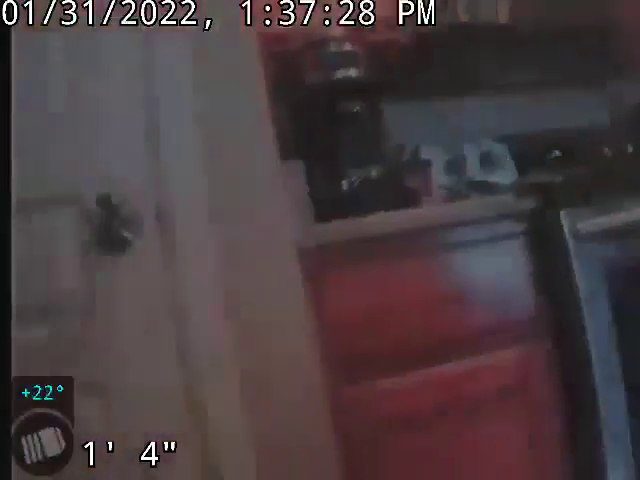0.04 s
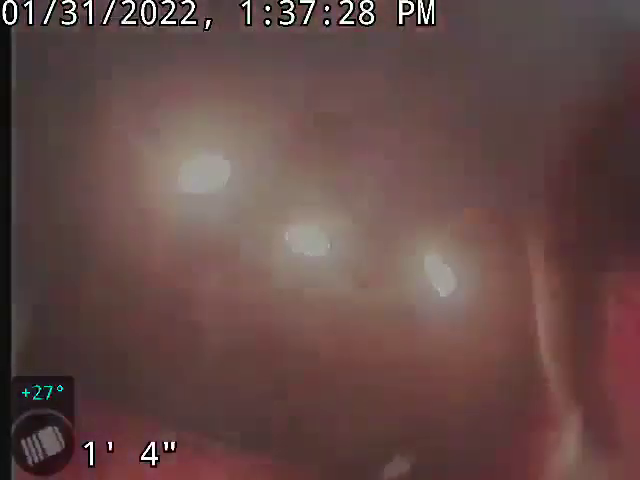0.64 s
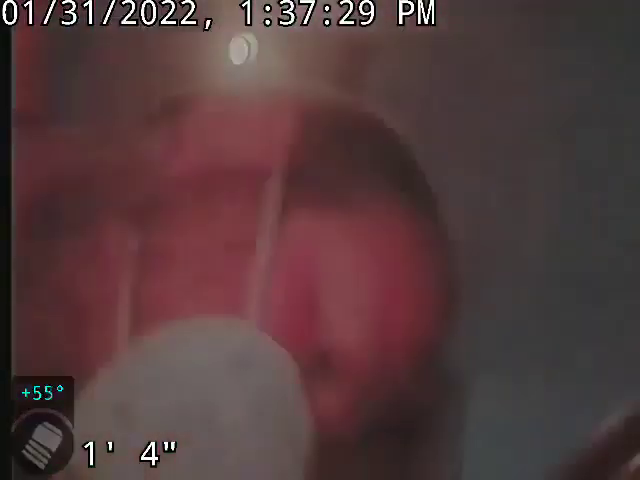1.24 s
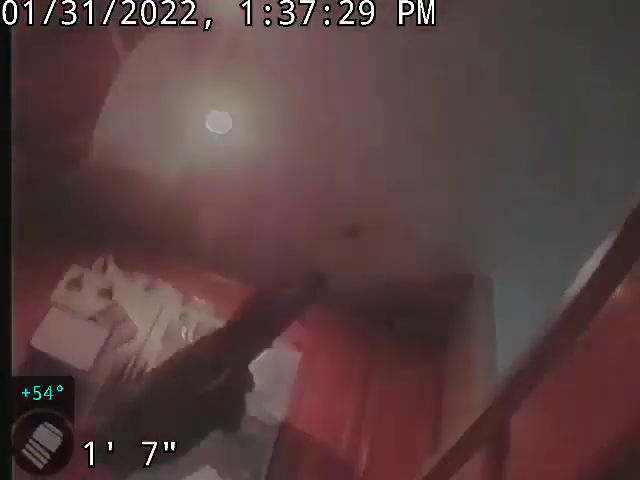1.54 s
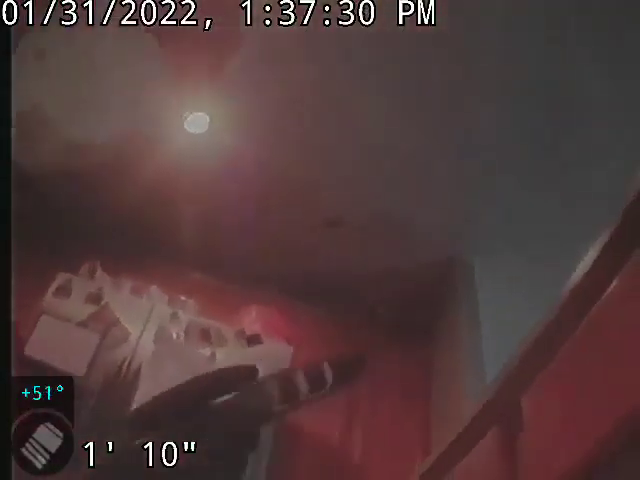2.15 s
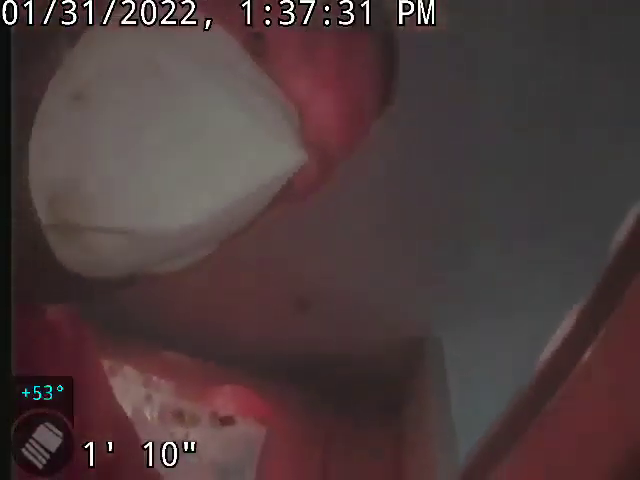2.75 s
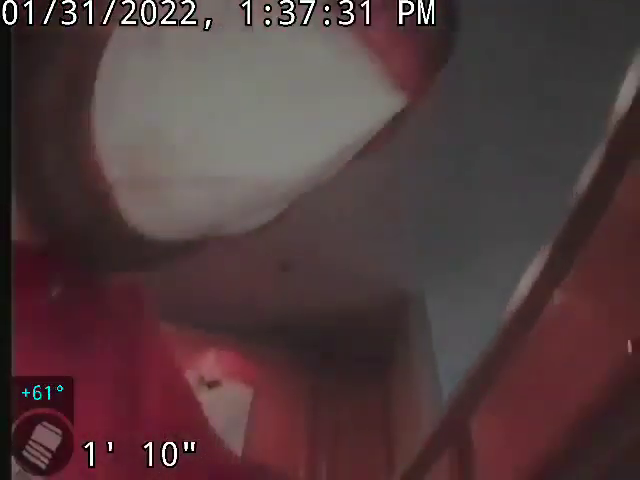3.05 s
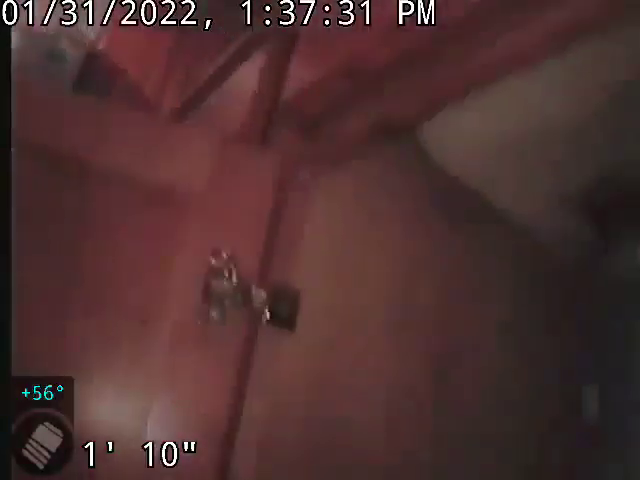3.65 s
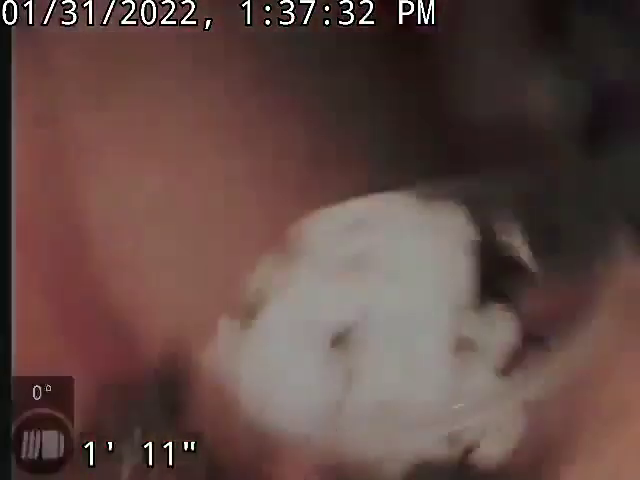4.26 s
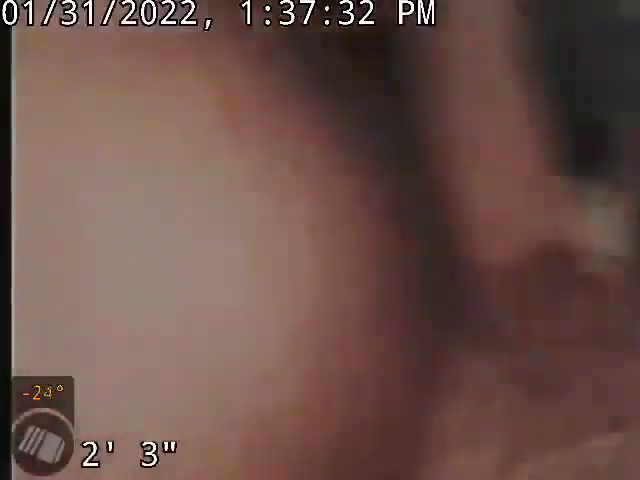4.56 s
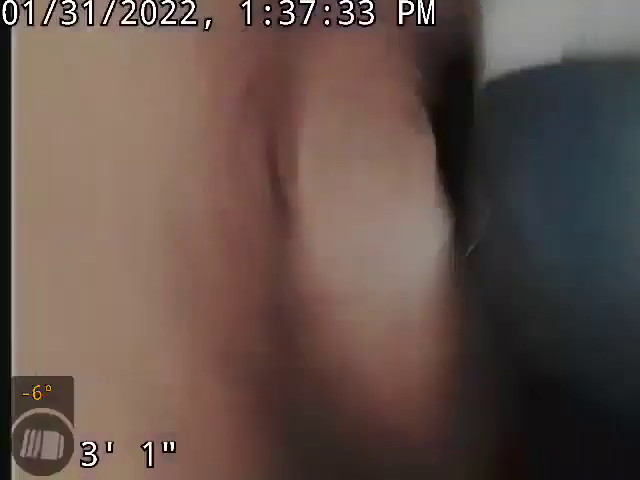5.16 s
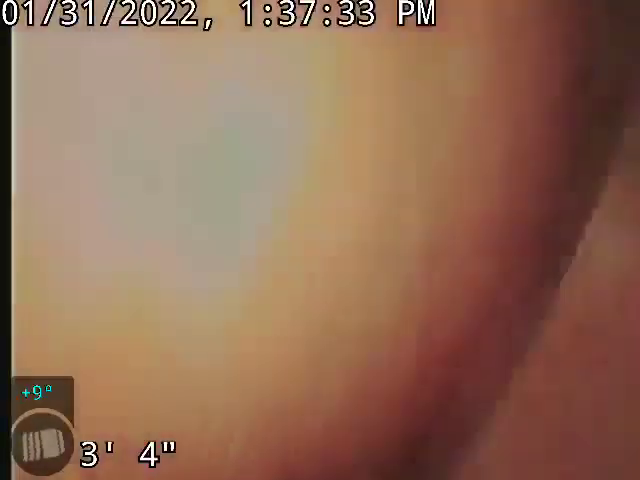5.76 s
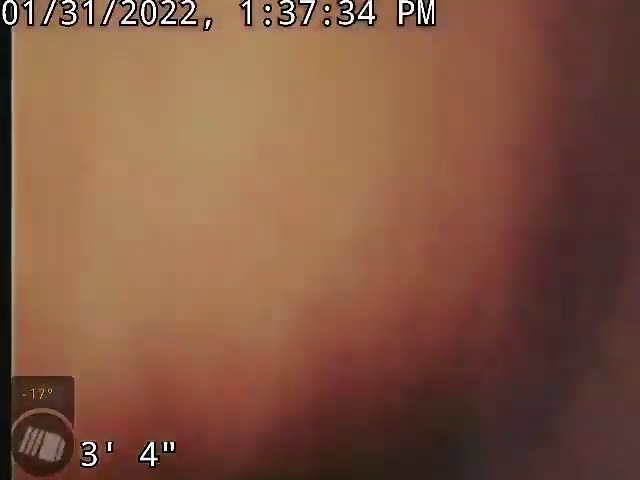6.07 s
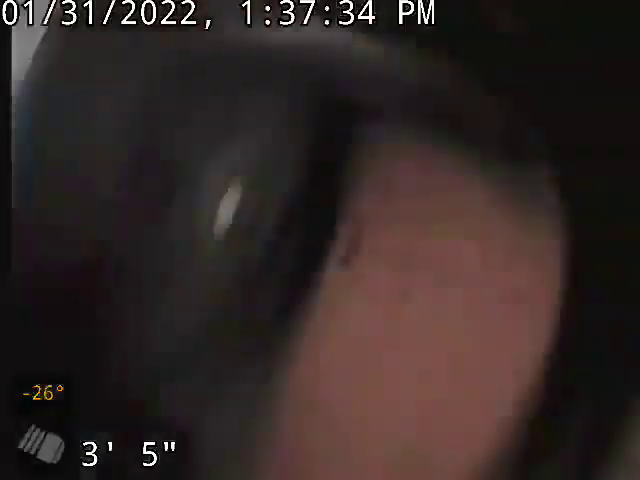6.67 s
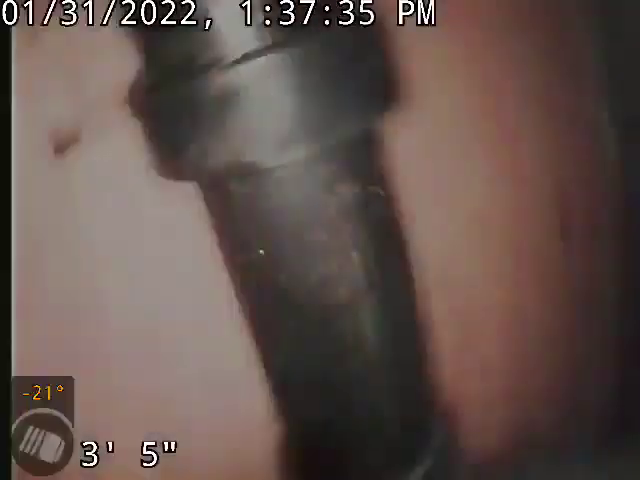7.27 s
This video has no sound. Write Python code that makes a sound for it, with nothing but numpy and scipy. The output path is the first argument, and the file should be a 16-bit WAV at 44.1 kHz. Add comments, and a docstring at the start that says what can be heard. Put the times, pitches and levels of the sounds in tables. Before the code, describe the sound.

In a small kitchen, a low hum and rumble lie under the soft scrape and squeak of a push cable and a few ticks and knocks. Hard, booming bumps hit the housing right at the microphone, and the reel's frame thuds on the floor. Then quieter handling continues: coils tap the reel, the cable ticks in its guide, and uneven knocks sound as the scraping grows a little.

```python
"""First comes a low room rumble and hum, with the faint scrape and squeak of a cable. It is an inspection
camera's push cable, pulled off its reel and fed towards a drain under a kitchen sink. It rubs and ticks
through its guide, its coils tap the reel, and the camera head and reel knock in the small room.
From about two seconds in, the unit that holds the microphone takes a few hard bumps that make its hollow
housing boom, and the frame rocks on the floor. Then the scraping and knocking go on."""
import sys
import numpy as np
from scipy import signal
from scipy.fft import rfft, irfft
from scipy.io import wavfile

SR = 44100
rng = np.random.default_rng(int(sys.argv[2]) if len(sys.argv) > 2 else 0)


def inscribe(sig):
    """Save sig as 16-bit PCM at rate SR to the path in sys.argv[1].

    A 1-D sig is mono; a 2-D sig holds one channel per row.
    Samples are clipped to [-1, 1] before scaling.
    """
    pcm = np.round(np.clip(np.atleast_2d(sig).T, -1, 1) * 32767)
    wavfile.write(sys.argv[1], SR, pcm.astype(np.int16))


N = 327222
TIME = np.arange(N) / SR   # seconds since the scene began
AGE = np.arange(int(.5 * SR)) / SR   # seconds since a hit

# Rumble of the room and of handling. Each row: time in seconds, level in dB.
RUMBLE_LEVELS = [(0, -60.5), (.9, -51.5), (1.6, -47), (1.8, -54), (2.4, -55.5), (3.3, -47), (3.55, -69),
                 (4.4, -66), (4.85, -59), (5.5, -65.5), (6.1, -53), (7.1, -55), (7.42, -50)]
# Tones of the hum. Each row: pitch in Hz, level in dB.
HUM_TONES = [(59.2, -56), (101, -56.5), (181, -61.5)]
# The hum fades as the unit is moved. Each row: time in seconds, gain in dB.
HUM_FADE = [(3.1, -2), (3.5, -18)]
# Quiet scraping between pushes. Each row: time in seconds, level in dB.
CREEP_LEVELS = [(0, -64.5), (2.2, -61), (3.5, -63), (4.2, -62.5), (5.55, -65), (6.3, -60.5), (7.42, -45.5)]
# Pushes that turn the reel. Each row: start and length in seconds, scrape level in dB, groan pitch in Hz.
CABLE_PUSHES = [(0.78, 0.13, -45, 239.4), (0.964, 0.21, -59, 240.3), (1.162, 0.09, -52, 237.2),
                (1.518, 0.17, -56, 251.3), (2.189, 0.043, -42.5, 218), (4.318, 0.3, -57.5, 223),
                (4.592, 0.3, -50, 235), (4.919, .22, -51.5, 437), (6.749, 0.16, -48, 216),
                (6.98, 0.22, -44.5, 206.4), (7.155, 0.37, -46.5, 440.6)]
# The cable slips through the hand. Each row: start and length in seconds, hiss and rasp levels in dB.
HAND_SLIPS = [(0.735, 0.18, -68, -63.5), (1.178, 0.52, -70, -66), (1.686, 0.064, -60, -71),
              (3.627, 0.098, -89.5, -73), (3.943, 0.05, -73, -69.5), (4.395, 0.22, -71, -69.5),
              (4.594, 0.29, -78, -67), (5.099, 0.31, -80.5, -73.5), (6.365, 0.19, -70, -64),
              (6.654, 0.22, -60, -66)]
# The cable's jacket sings. Each row: start and length in seconds, level in dB, first and last pitch in Hz.
JACKET_SQUEAKS = [(0, 0.98, -71, 807, 1180), (1.92, 0.25, -77, 1393, 1740), (6.07, 0.011, -56, 4100, 3980),
                  (6.308, 0.19, -73.5, 2134, 2310), (6.43, .035, -67, 4550, 4660)]
# Coils tap the reel. Each row: start in seconds, level in dB.
COIL_TAPS = [(0.503, -58), (0.607, -58), (1.081, -52), (1.675, -51), (3.208, -43), (3.613, -49),
             (3.836, -54), (3.953, -53.5), (4.214, -51), (4.333, -47), (4.624, -42), (4.673, -44.5),
             (5.317, -51), (6.469, -37.5), (6.784, -42), (6.986, -42), (7.32, -42)]
# The cable ticks in its guide. Each row: start in seconds, level in dB.
GUIDE_TICKS = [(1.295, -33.5), (1.589, -34), (1.723, -39), (3.8668, -50), (4.9228, -34.5), (4.966, -37.5),
               (5.0752, -38.5), (5.163, -41.5), (5.729, -56)]
# Head and reel knock. Each row: start in seconds, level in dB, extra lows in dB, extra clack in dB,
# treble limit in Hz, chatter fade in seconds, main and second ring in Hz, clang in dB, room echo in dB.
REEL_KNOCKS = [(1.422, -29, 6, -4, 4150, 0.0055, 239.5, 560, -28, -11),
               (2.938, -40.5, -5.5, -3.5, 5120, 0.011, 216, 860, -9, -13.5),
               (4.579, -39, 3, 2.5, 8600, 0.0044, 200, 480, 6, -15),
               (4.785, -43, 9, 9.5, 11100, 0.0043, 453, 623, 1, -15.5),
               (4.846, -44, 5, 8, 7000, 0.0084, 766, 625, 9, -9),
               (4.985, -45, 9.5, 6.5, 9340, 0.0027, 454, 502, 10.5, -12),
               (5.974, -36.5, 8.5, -4.5, 3310, 0.0099, 445, 532, 2.5, -13.5),
               (6.022, -28, 10, 7, 2620, 0.015, 418, 684, -1.5, -15.5),
               (6.479, -28, 6.5, -0.5, 11400, 0.009, 457, 237, 2, -12.5),
               (7.135, -34, 8, 7, 9300, 0.0075, 439, 640, 4.5, -11.5)]
# Hard plastic clicks right at the microphone. Each row: start in seconds, level in dB.
PLASTIC_CLICKS = [(1.672, -49), (1.697, -41), (2.2158, -34), (2.242, -29), (2.2517, -28.5), (3.1238, -27),
                  (3.142, -33), (3.286, -32)]
# Bumps on the housing. Each row: start in seconds, level in dB, extra boom in dB,
# brightness in dB per octave, ring pitch in Hz.
HOUSING_BUMPS = [(2.2319, -30, 7, 3, 202), (2.2461, -25, -13, 0, 200), (3.114, -4.5, 2.5, 0, 287),
                 (3.1301, -19.5, 5.5, -1.2, 151), (3.316, -17.5, -4, -3.5, 189.6), (3.3353, -5, 0, 1, 386),
                 (3.3655, -20.5, 4, 3, 640), (3.3704, -8.5, -2, 0, 190), (3.403, -22.5, 6.5, 1.16, 180)]
# The frame rocks on the floor. Each row: start in seconds, level in dB, pitch in Hz, fade in seconds.
FRAME_THUDS = [(2.2421, -24, 42.5, 0.055), (3.122, -11, 76, 0.017), (3.139, -15, 46, 0.025),
               (3.27, -20.5, 79, 0.033), (3.344, -11.5, 110, 0.0099), (3.386, -19.5, 59.7, 0.022),
               (6.026, -21.5, 89.9, 0.036), (7.223, -25, 49.5, 0.059)]
# The housing is dragged. Each row: time in seconds, level in dB.
DRAG_LEVELS = [(3.17, -86.5), (3.21, -46), (3.29, -36), (3.37, -40.5), (3.41, -53), (3.44, -93.5)]
# Notes at which the reel and the hollow housing ring. Each row: pitch in Hz, width in Hz, gain in dB.
REEL_MODES = [(183, 57, 17), (454.2, 4.8, 16.5), (525, 160, 11), (750, 140, 10.5), (1254, 340, 1.5),
              (3250, 69, -11.5)]
HOUSING_MODES = [(51.7, 54, 3), (171, 65, 18.5), (311, 100, 0), (640, 690, 10.5), (970, 110, -3.5)]
# Five bands of a hit: boom, body, clack, snap, fizz. Each row: low edge in Hz, high edge in Hz.
BANDS = [(30, 160), (160, 700), (700, 2500), (2500, 7000), (10500, 14500)]
# A plain knock and a plain bump. Each holds one level in dB for each of the five bands.
KNOCK_BAND_DB = [-7.5, 0, 0.5, -4, -11]
BUMP_BAND_DB = [1.5, 2, -12, -24.5, -29.5]
# The tone colour of each noise, from low to high. Each row: frequency in Hz, gain in dB.
RUMBLE_SPECTRUM = [(20, -14.5), (40, 1), (60, 6.5), (105, -0.5), (140, -8.5), (230, -7.5), (340, -16),
                   (550, -32.5), (1000, -62.5)]
SCRAPE_SPECTRUM = [(100, -27.5), (160, -13), (230, -3), (350, -9.5), (950, -17.5), (1300, -20), (2000, -32),
                   (4000, -43)]
RASP_SPECTRUM = [(600, -18.5), (1700, -5.5), (3000, 2.5), (5000, -1.5), (7500, -6.5), (10000, -27)]
HISS_SPECTRUM = [(6000, -28), (9000, -9), (12500, 0), (15000, -8)]
DRAG_SPECTRUM = [(40, -8), (100, 12.5), (300, -6), (700, -9.5), (2000, -21), (6000, -32.5), (14000, -33)]

ROOM_DECAY_S = 0.045
PUSH_ATTACK_S, PUSH_RELEASE_S = 0.021, 0.055


def from_db(db):
    """Turn decibels into a number to multiply by."""
    return 10 ** (np.asarray(db) / 20)


def unit_power(x):
    """Scale a sound so that its average power is 1."""
    return x / np.sqrt(np.mean(x ** 2) + 1e-20)


def level_curve(rows):
    """Join (seconds, dB) points into a gain for every sample."""
    times, db = np.transpose(rows)
    return from_db(np.interp(TIME, times, db))


def add(out, start, sound):
    """Mix a sound in at a start time in seconds."""
    i = max(0, round(start * SR))
    out[i:i + len(sound)] += sound[:N - i]


def filtered(x, hz, kind, order=2):
    """Keep the lows, the highs or one band of a sound."""
    sections = signal.butter(order, np.clip(hz, 10, .45 * SR), kind, fs=SR, output="sos")
    return signal.sosfilt(sections, x + 1e-18)


def coloured(x, spectrum):
    """Give a steady sound a tone colour, at power 1."""
    hz, db = np.transpose(spectrum)
    bins = np.maximum(np.fft.rfftfreq(N, 1 / SR), 1)
    gain = from_db(np.interp(np.log(bins), np.log(hz), db))
    return unit_power(irfft(rfft(x) * gain, N))


def drift(rate):
    """Wander to a new random value `rate` times a second."""
    points = rng.standard_normal(2000)
    return unit_power(np.interp(TIME * rate, np.arange(len(points)), points))


def resonance(x, hz, width):
    """Let a sound ring at one pitch; a narrower width rings longer."""
    r = np.exp(-np.pi * width / SR)
    feedback = [1, -2 * r * np.cos(2 * np.pi * hz / SR), r * r]
    return signal.lfilter(np.array([1, 0, -1]) * (1 - r * r) / 2, feedback, x + 1e-18)


def ringing(x, modes, spread_db, gain_db=0):
    """An object rings at several notes, each with a strength that varies by chance."""
    return sum(resonance(x, hz, width) * from_db(db + gain_db + rng.normal(0, spread_db))
               for hz, width, db in modes)


def reel(x, ring_db):
    """A force passes straight through and also rings the reel."""
    return x + ringing(x, REEL_MODES, spread_db=0.68, gain_db=ring_db)


def friction(grain_db, surge_db, surge_rate):
    """Rubbing is many tiny slips of uneven size, coming in surges."""
    size = np.repeat(rng.standard_normal(N // 32 + 1), 32)[:N]
    return rng.standard_normal(N) * from_db(grain_db * size + surge_db * drift(surge_rate))


def reflections(x, shift_s=0.47, count=3):
    """Echoes from the cabinet and floor colour the sound, taking turns as the cable moves."""
    out, age = x.copy(), AGE[AGE < .07]
    for k in range(count):
        response = rng.standard_normal(len(age)) * np.exp(-age / .012)
        echo = signal.oaconvolve(x, response / np.linalg.norm(response))[:N]
        away = np.abs((TIME / shift_s - k) % count - count / 2)
        out += .5 * np.sqrt(np.maximum(1 - away, 0)) * echo
    return out


def stroke(length, attack, release):
    """A movement gathers speed, holds and dies away."""
    t = TIME[:int((length + 8 * release) * SR)]
    rise = np.sin(np.pi / 2 * np.minimum(t / attack, 1)) ** 2
    return rise * np.exp(-np.maximum(t - length, 0) / release)


def strokes(rows):
    """One gain curve for many movements; where they overlap, their powers add."""
    power = np.zeros(N)
    for start, length, db, attack, release in rows:
        add(power, start, (from_db(db) * stroke(length, attack, release)) ** 2)
    return np.sqrt(power)


def rough_tone(pitch, width_hz):
    """An unsteady note kept going by rubbing, at power 1."""
    cosine, sine = filtered(rng.standard_normal((2, len(pitch))), width_hz, "low")
    phase = 2 * np.pi * np.cumsum(pitch) / SR
    return unit_power(cosine * np.cos(phase) + sine * np.sin(phase))


def note(hz, db, decay_s):
    """One struck note dying away."""
    return from_db(db) * np.sin(2 * np.pi * hz * AGE) * np.exp(-AGE / decay_s)


def strike(decay_s, rings, room_db):
    """A short chatter shakes the reel, the struck spot rings, and the room answers, duller and longer."""
    contact, echo = rng.standard_normal((2, len(AGE)))
    contact = contact * np.exp(-AGE / max(decay_s, .001))
    echo = filtered(echo, 2700, "low", order=1) * np.exp(-AGE / ROOM_DECAY_S)
    room = from_db(room_db) * reel(echo, ring_db=1.5)
    return filtered(reel(contact, ring_db=-1.0) + rings + room, 420, "low", order=1)


def balanced(x, band_db, window_s):
    """Set how strong a hit's first moments are in each of the five bands."""
    early = np.clip((window_s - AGE) * SR, 0, 1)
    parts = [filtered(x, band, "band", order=2 if band[1] < 1000 else 3) for band in BANDS]
    return sum(part * from_db(db) / np.sqrt(np.average(part ** 2, weights=early))
               for part, db in zip(parts, band_db))


def rumble(gain_db=3):
    """The room and the handling make a low noise that swells and sinks."""
    noise = coloured(rng.standard_normal(N), RUMBLE_SPECTRUM)
    return from_db(gain_db) * level_curve(RUMBLE_LEVELS) * noise


def hum(waver=0.011, swell_db=0.5, waver_rate=5):
    """A faint hum in the room; each tone wavers a little in pitch and strength."""
    out = np.zeros(N)
    for hz, db in HUM_TONES:
        phase = 2 * np.pi * np.cumsum(hz * (1 + waver * drift(waver_rate))) / SR
        swell = from_db(swell_db * drift(waver_rate))
        out += from_db(db) * unit_power(np.sin(phase) * swell)
    return level_curve(HUM_FADE) * out


def cable(scrape_db=-1, rasp_share_db=-23, hiss_share_db=-24.5, crackles_per_s=57):
    """Pushes shake the reel and rasp in the guide; slips hiss through the hand."""
    creep = level_curve(CREEP_LEVELS)
    pushes = strokes((start, length, db, PUSH_ATTACK_S, PUSH_RELEASE_S)
                     for start, length, db, _ in CABLE_PUSHES)
    start, length, hiss_db, rasp_db = np.transpose(HAND_SLIPS)
    attack, release = 0.63 * length, 0.13 * length
    slip_hiss = strokes(zip(start, length, hiss_db, attack, release))
    slip_rasp = strokes(zip(start, length, rasp_db, attack, release))
    scrape_gain = np.hypot(creep, pushes)   # hypot adds the two powers
    hiss_gain = np.hypot(from_db(hiss_share_db) * creep, slip_hiss)
    rasp_gain = np.hypot(from_db(rasp_share_db) * scrape_gain, slip_rasp)
    # grit on the jacket catches in the guide
    crackle = (rng.random(N) < crackles_per_s / SR) * rng.normal(0, 8, N)
    coarse_rub = friction(grain_db=2.5, surge_db=3.0, surge_rate=45) + crackle
    scrape = coloured(reel(reflections(coarse_rub), ring_db=-12.5), SCRAPE_SPECTRUM)
    fine_rub = friction(grain_db=1.0, surge_db=1.4, surge_rate=61) + crackle
    rasp = coloured(reel(reflections(fine_rub), ring_db=-15.0), RASP_SPECTRUM)
    hiss = coloured(fine_rub, HISS_SPECTRUM)
    return from_db(scrape_db) * scrape_gain * scrape + rasp_gain * rasp + hiss_gain * hiss


def squeaks(width_share=0.12):
    """The jacket sticks and slips around one rough pitch, which glides as the cable runs."""
    out = np.zeros(N)
    for start, length, db, first_hz, last_hz in JACKET_SQUEAKS:
        shape = stroke(length, attack=0.0038, release=0.0092)
        pitch = np.interp(TIME[:len(shape)], [0, length], [first_hz, last_hz])
        add(out, start, from_db(db) * shape * rough_tone(pitch, width_share * first_hz))
    return out


def taps(ring_hz=540, ring_spread=0.167, dulling=0.16):
    """Coils softly hit the reel at a new spot each time; the weaker the tap, the duller it is."""
    out = np.zeros(N)
    firmest_db = max(db for _, db in COIL_TAPS)
    for start, db in COIL_TAPS:
        ring = note(ring_hz * np.exp(rng.normal(0, ring_spread)), db=-7, decay_s=0.017)
        dull_db = dulling * (firmest_db - db)
        band_db = [-12, 2.5, -3.5 - dull_db, -18.5 - 2 * dull_db, -60]
        hit = strike(0.0046, ring, room_db=-15)
        add(out, start, from_db(db) * balanced(hit, band_db, window_s=0.008))
    return out


def groans(gain_db=-2.5, width_share=0.052):
    """Each push keeps one low note of the reel sounding."""
    out = np.zeros(N)
    for start, length, db, hz in CABLE_PUSHES:
        shape = stroke(length, PUSH_ATTACK_S, PUSH_RELEASE_S)
        tone = rough_tone(np.full(len(shape), hz), width_share * hz)
        add(out, start, from_db(db + gain_db) * shape * tone)
    return out


def ticks(gain_db=-9, decay_s=0.0095, room_db=-14):
    """The cable touches its guide: small bright bursts with a faint room echo."""
    out = np.zeros(N)
    shape = np.exp(-AGE / decay_s) + from_db(room_db) * np.exp(-AGE / ROOM_DECAY_S)
    for start, db in GUIDE_TICKS:
        add(out, start, from_db(db + gain_db) * shape * rng.standard_normal(len(AGE)))
    return filtered(filtered(out, 2850, "high", order=3), 6200, "low", order=1)


def knocks(gain_db=-4, clang_hz=1252):
    """Head and reel knock: heavy hits have more lows, hits on the drum more clack, soft ones less treble."""
    out = np.zeros(N)
    centres = np.sqrt(np.prod(BANDS, axis=1))
    lows, clack = np.array([[1, 1, 0, 0, 0], [0, 0, 1, 0, 0]])
    for (start, db, lows_db, clack_db, treble_hz, decay_s,
         main_hz, second_hz, clang_db, room_db) in REEL_KNOCKS:
        softness_db = 10 * np.log10(1 + (centres / treble_hz) ** 4)
        band_db = KNOCK_BAND_DB + lows_db * lows + clack_db * clack - softness_db
        rings = note(main_hz, db=-4.5, decay_s=0.02) + note(second_hz, db=-6.0, decay_s=0.018)
        rings += note(clang_hz, db=clang_db - 7, decay_s=0.0068)   # a bright clang of the reel
        hit = filtered(strike(decay_s, rings, room_db), 1.23 * treble_hz, "low")
        add(out, start, from_db(db + gain_db) * balanced(hit, band_db, window_s=.026))
    return out


def clicks(gain_db=-3, decay_s=0.00091):
    """A plastic catch lets go in a millisecond or two, so close that no room echo is heard."""
    out = np.zeros(N)
    for start, db in PLASTIC_CLICKS:
        add(out, start, from_db(db + gain_db) * np.exp(-AGE / decay_s) * rng.standard_normal(len(AGE)))
    return filtered(out, 1500, "high", order=1)


def bumps(gain_db=-5.0, push_s=0.00043, crack_delay_s=0.0011, crack_s=0.00066, crack_db=-26,
          rattle_s=0.0074, rattle_db=-22):
    """A push sets the housing booming; a moment later its shell gives a dry crack and a duller rattle."""
    out = np.zeros(N)
    push = AGE / push_s * np.exp(-AGE / push_s)
    crack_age = np.maximum(AGE - crack_delay_s, 0) / crack_s
    octaves = np.log2(BANDS).mean(axis=1)
    boom = np.arange(len(BANDS)) == 0
    for start, db, boom_db, brightness, ring_hz in HOUSING_BUMPS:
        snap, loose = rng.standard_normal((2, len(AGE)))
        rattle = filtered(loose * np.abs(loose), 1100, "low", order=1) * np.exp(-AGE / rattle_s)
        crack = snap * crack_age * np.exp(-crack_age) + from_db(rattle_db) * rattle
        hollow = ringing(push + 2 * crack, HOUSING_MODES, spread_db=3.5)
        hit = hollow + from_db(crack_db) * crack + note(ring_hz, db=-10, decay_s=0.0076)
        hit = filtered(hit, 340, "low", order=1)   # the plastic shell soaks up the highs
        band_db = BUMP_BAND_DB + boom_db * boom + brightness * (octaves - octaves[1])
        add(out, start, from_db(db + gain_db) * balanced(hit, band_db, window_s=.016))
    return out


def thuds(overtone=0.27):
    """The frame sways on the floor for a few cycles, with a weaker tone an octave up."""
    out = np.zeros(N)
    for start, db, hz, decay_s in FRAME_THUDS:
        phase = 2 * np.pi * hz * AGE
        sway = np.sin(phase) + overtone * np.sin(2 * phase)
        add(out, start, from_db(db) * sway * np.exp(-AGE / decay_s))
    return out


def drag():
    """The housing is dragged for a moment and makes a low rubbing noise."""
    rub = friction(grain_db=2.5, surge_db=2.0, surge_rate=77)
    return level_curve(DRAG_LEVELS) * coloured(rub, DRAG_SPECTRUM)


def scene():
    """Everything reaches one small microphone."""
    hits = knocks() + taps() + bumps() + thuds() + ticks() + clicks()
    rubbing = squeaks() + cable() + groans()
    return (hits + rubbing + rumble() + drag() + hum())[None]


def record(dry, notch_depth=0.8, peak_db=-9, ceiling=0.6, cutoff_hz=13900):
    """The microphone's cavity makes a dip and a peak in the treble; bumps are rounded, the top is cut."""
    x = dry - notch_depth * resonance(dry, hz=8900, width=2600)
    x = x + from_db(peak_db) * resonance(x, hz=12200, width=2000)
    x = ceiling * np.tanh(x / ceiling)
    return signal.sosfilt(signal.ellip(10, .3, 80, cutoff_hz, fs=SR, output="sos"), x)


dry = scene()
out = record(dry)
inscribe(out)
```